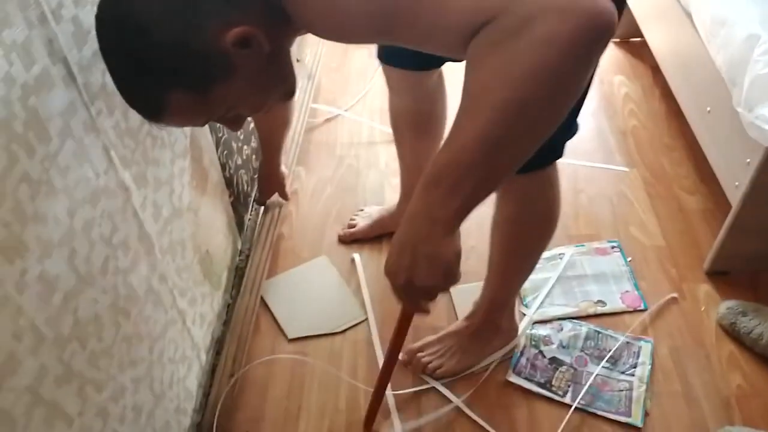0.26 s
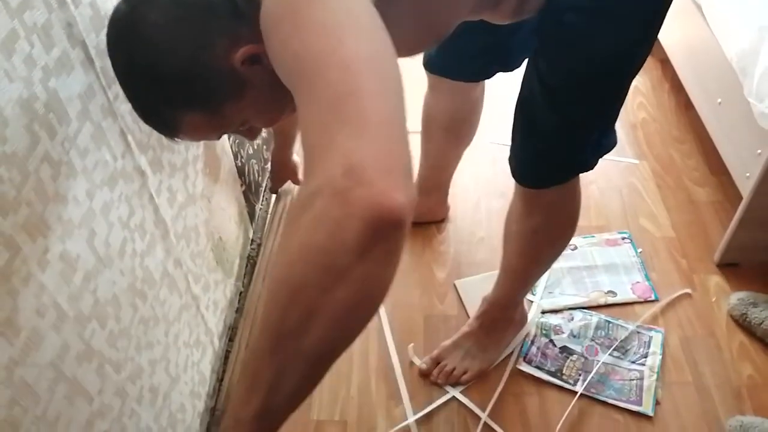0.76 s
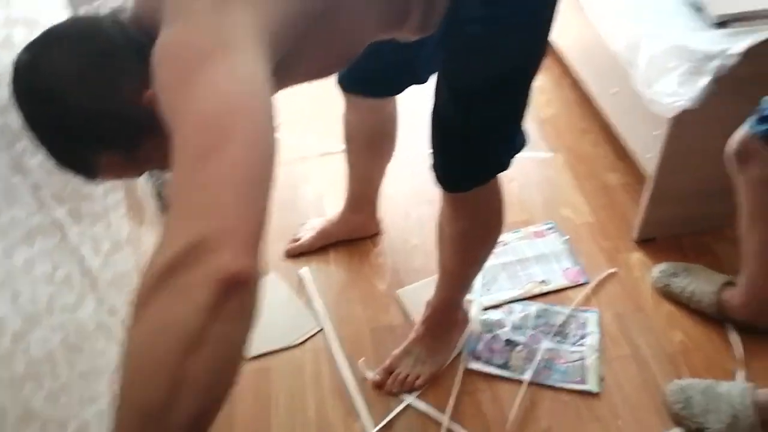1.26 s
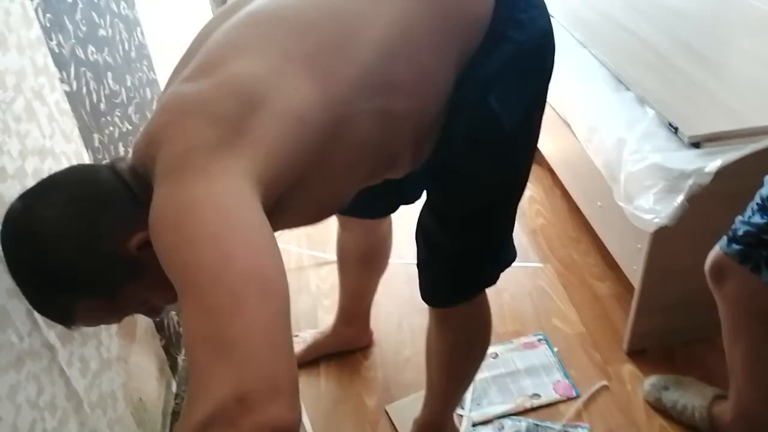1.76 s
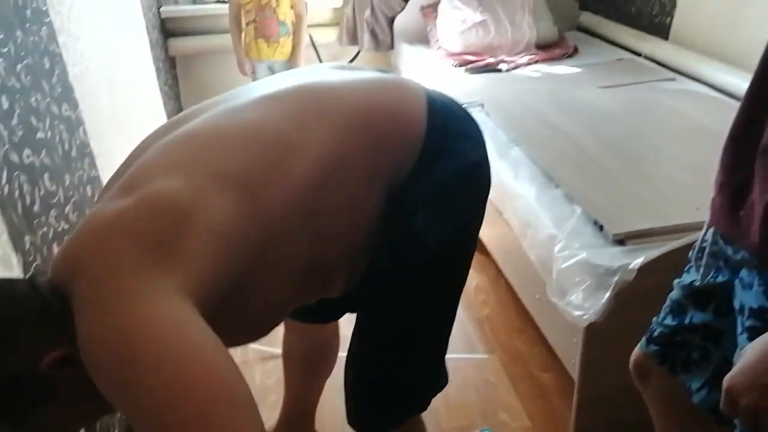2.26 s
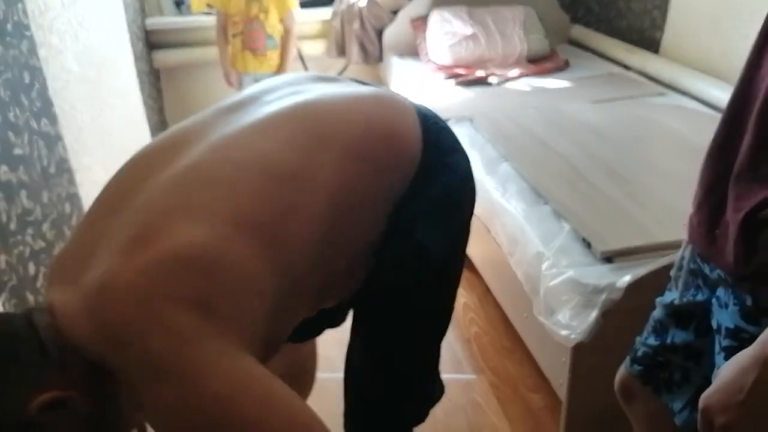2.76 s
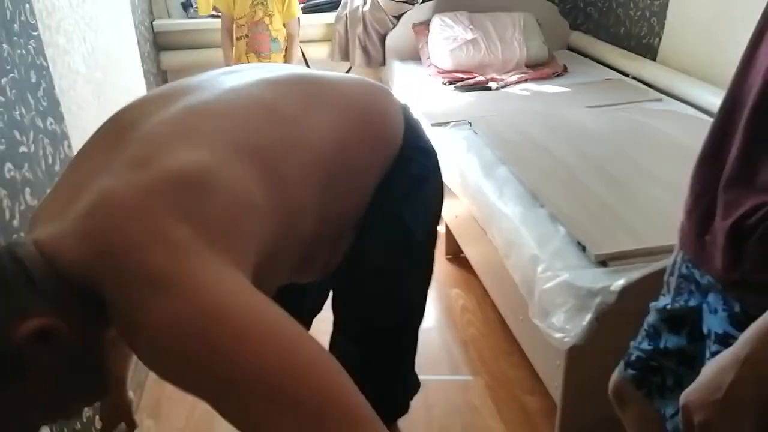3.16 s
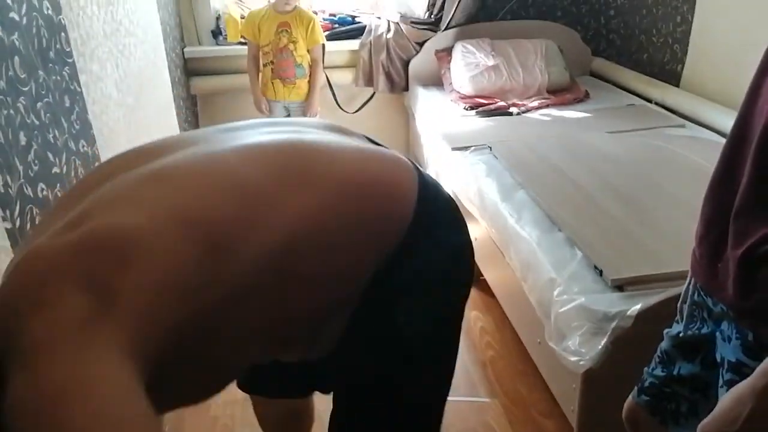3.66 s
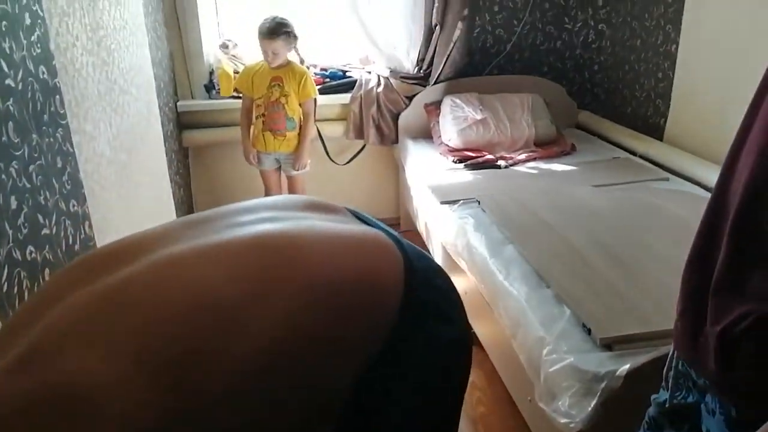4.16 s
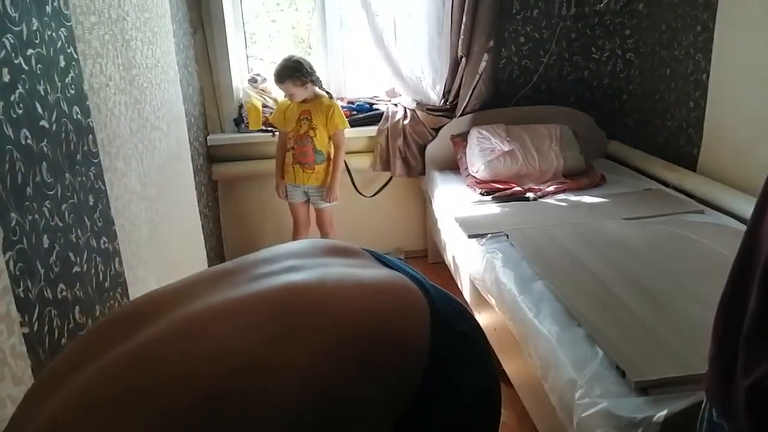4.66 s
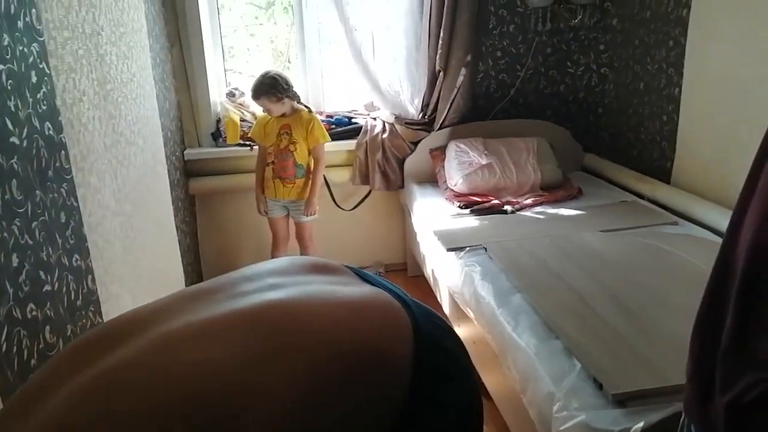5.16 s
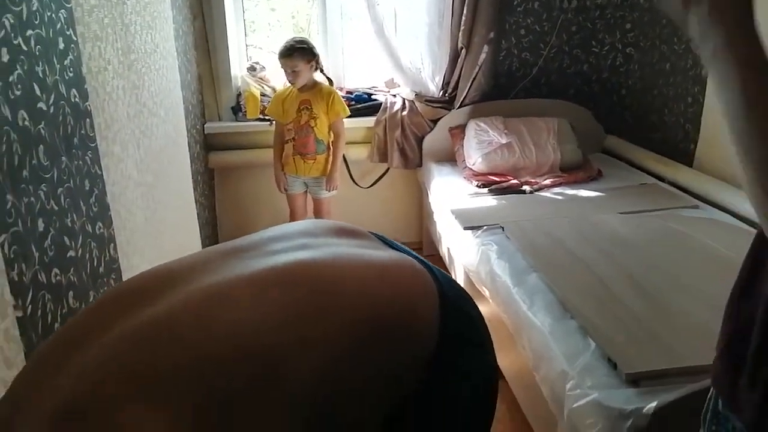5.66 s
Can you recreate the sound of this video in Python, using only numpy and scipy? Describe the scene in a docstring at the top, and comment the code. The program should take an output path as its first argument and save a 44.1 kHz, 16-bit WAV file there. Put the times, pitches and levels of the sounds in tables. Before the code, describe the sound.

A bar pries wooden boards loose in a small room: scattered knocks and cracks, a creaking nail, then a burst of much louder wooden blows.

```python
"""Prying skirting loose

A bar pries wooden skirting loose in a small furnished room, a step from a handheld phone.
Boards knock as crowded damped modes with a crack of noise; a nail creaks out in stick-slip rasps.
Feet and wood scuff as grainy noise, and floor modes thud when struck and groan when pushed.
Low damped sways of the phone in the hand, the room's tail and a steady hush complete the take."""
import sys
import numpy as np
from scipy import signal
from scipy.fft import rfft, irfft
from scipy.io import wavfile

SR = 44100
rng = np.random.default_rng(int(sys.argv[2]) if len(sys.argv) > 2 else 0)


def invert_db(x):
    """Field ratio 10**(x/20) for x, a level in decibels (scalar or array-like)."""
    u = np.asarray(x, float) / 20
    return 10 ** u


def generate_wav(signal):
    """Clip the signal to [-1, 1] and save it as 16-bit WAV at the path in sys.argv[1]."""
    frames = np.transpose(np.atleast_2d(signal))
    scaled = np.clip(frames, -1, 1) * 32767
    pcm = np.round(scaled).astype(np.int16)
    wavfile.write(sys.argv[1], SR, pcm)


N = 260190  # samples, 5.9 s

# Knocks of board and bar. Each row: time in seconds, board level in dB, strongest board pitch in Hz,
# crack level before its colouring in dB relative to the board.
BLOWS = [(0.078, -53, 2200, 10), (0.094, -39.5, 2930, 15), (0.267, -40, 1083, 12.5),
         (0.519, -35.5, 1090, 7.5), (0.53, -30.5, 2520, 8.5), (0.601, -40, 1860, 5.5),
         (0.648, -25.5, 3200, -0.5), (0.651, -27, 900, 5), (0.689, -30, 1000, -25),
         (0.785, -31.5, 2680, -1.5), (0.893, -34.5, 1100, -4.5), (0.899, -27.5, 960, -19),
         (0.993, -30, 787, -4.5), (1.31, -46, 2580, 16), (1.328, -46, 3000, 21.5),
         (1.355, -38.5, 1090, 10.5), (1.572, -40.5, 2740, -14), (1.65, -33.5, 2150, 1.5),
         (1.811, -48.5, 940, 5), (1.972, -43, 764, -32), (2.014, -41.5, 2370, 5), (2.075, -42, 780, -25),
         (2.247, -26.5, 576, -20), (2.302, -36.5, 3410, 19), (2.684, -31.5, 2000, 1),
         (3.078, -37.5, 2400, 1), (3.083, -21.5, 1990, -9), (3.297, -47.5, 950, -3), (3.48, -33, 2540, -2),
         (3.528, -43, 2480, 6), (3.531, -31.5, 2800, 0), (3.579, -39.5, 1780, -24), (3.971, -43, 700, -5.5),
         (4.085, -45, 1166, 1), (4.16, -45.5, 1170, 0), (4.235, -36.5, 1000, -13),
         (4.311, -41.5, 2980, -2.5), (4.97, -55, 3020, 11), (5.039, -29, 1090, 6), (5.085, -11.5, 830, 0.5),
         (5.151, -13.5, 773, 2), (5.459, -13.5, 1930, 1.5), (5.7, -10, 746, 0), (5.752, -13.5, 620, 1),
         (5.802, -16, 820, 1)]
# Modes of the floorboards. Each row: pitch in Hz, relative level in dB,
# time to ring down 60 dB with no weight on the board in seconds.
FLOOR_MODES = [(60, -45, 0.12), (100, -2, 0.094), (155, -4.5, 0.044), (185.8, 4.5, 0.1), (232.8, 1.5, 0.15),
               (291.1, 3, 0.11), (349, -0.5, 0.036), (412.3, 1.5, 0.25), (484, -20, 0.097)]


def unit(x):
    """Scale to rms 1."""
    return x / np.sqrt(np.mean(x ** 2))


def read(points, hz):
    """A curve table at the given frequencies, straight lines over log frequency."""
    f, v = np.transpose(points)
    return np.interp(np.log(np.maximum(hz, 1)), np.log(f), v)


def colour(x, points, taps=1024):
    """Causal filter with the gain of (Hz, dB) points, from the folded cepstrum."""
    grid_hz = np.arange(taps + 1) * SR / 2 / taps
    cepstrum = irfft(np.log(invert_db(read(points, grid_hz))))
    cepstrum[1:taps] *= 2
    cepstrum[taps + 1:] = 0
    impulse = irfft(np.exp(rfft(cepstrum)))[:taps]
    return signal.oaconvolve(x, np.atleast_2d(impulse), axes=-1)[:, :N]


def band(x, hz, width):
    """One resonance, gain 1 at the centre."""
    return signal.lfilter(*signal.iirpeak(hz, hz / width, SR), x)


def curves(table):
    """Columns of a time table at every sample."""
    s, *columns = np.transpose(table)
    return [np.interp(np.arange(N) / SR, s, c) for c in columns]


def sides(pan_db):
    """Left and right gain for a left minus right difference in dB."""
    return invert_db(np.array([pan_db, -pan_db]) / 2)


def add(out, s, sound):
    """Mix a sound in at time s."""
    i = int(s * SR)
    out[:, i:i + sound.shape[1]] += sound[:, :N - i]


def pair(n, unlike):
    """Noise for both microphone ports, partly unrelated."""
    mid, side = rng.standard_normal((2, n))
    return mid + unlike * side * np.array([[1], [-1]])


def ring(modes, t, near_hz, octaves):
    """One blow: modes close to near_hz speak most, each with a chance phase; peak 1."""
    hz, db, t60 = np.transpose(modes)[:, :, None]
    struck_db = np.maximum(-6 * (np.log2(hz / near_hz) / octaves) ** 2, -33)
    phase = 2.094 * rng.standard_normal((len(modes), 1))
    decay = invert_db(db + struck_db - 60 * t / t60)
    y = np.sum(decay * np.sin(2 * np.pi * hz * t + phase), axis=0)
    return y[None] / np.abs(y).max()


def stroke(length):
    """Level of one stroke: bites quickly, catches and slips on the way, eases off."""
    bite_share, ease_share = 0.2, 0.38  # of the stroke's length
    u = np.linspace(0, 1, int(length * SR))
    catches = rng.standard_normal(40)[:int(length * 60) + 2]
    uneven_db = 2.2 * np.interp(u, np.linspace(0, 1, len(catches)), catches)
    return invert_db(uneven_db) * np.minimum(u / bite_share, 1) * np.minimum((1 - u) / ease_share, 1)


def grains(per_s, spread_db, smear_s):
    """Dense grit: noise whose size jumps from grain to grain and trails off."""
    hits = (rng.random(N) < per_s / SR) * invert_db(spread_db * rng.exponential(size=N))
    size = signal.lfilter([1], [1, -np.exp(-1 / (smear_s * SR))], hits)
    return size * pair(N, 0.88)


def board_modes():
    """A loose board has many crowded, quickly damped modes, new for each blow; high ones die first."""
    # Strength of the board's modes. Each row: frequency in Hz, relative level in dB.
    board_levels = [(350, -9), (550, -6), (900, -1), (1500, -1), (2100, 1), (3000, -2), (3800, -12),
                    (4500, -8)]
    count, t60_at_1khz_s = 70, 0.03
    shift, size = rng.random((count, 2)).T
    hz = 400 + 4000 * ((np.arange(count) + shift) / count) ** 1.282
    db = read(board_levels, hz) - 4 * size
    return np.transpose([hz, db, t60_at_1khz_s * (hz / 1000) ** -.4])


def knocks():
    """Board modes and a short dry crack at every blow; harder blows wake modes over more octaves."""
    # Colour of the crack. Each row: frequency in Hz, gain in dB.
    snap_colour = [(1470, -23.5), (2500, -12.5), (2970, -8.5), (3740, -17.5), (3950, -13), (4730, -7.5),
                   (5650, -9.5), (8330, -8), (9290, -24), (15000, -28.5), (16000, -31)]
    soft_db, reach_octaves, reach_per_db = -26.5, 0.68, 0.41  # reach grows above soft_db
    rise_cycles = 1.05  # so blows of lower pitch push longer
    crack_rise_s, crack_fade_s = 0.00065, 0.0049
    wood, crack = np.zeros((2, 2, N))
    t = np.arange(SR // 10) / SR
    crack_shape = np.exp(-t / crack_fade_s) * np.minimum(t / crack_rise_s, 1)
    for s, db, board_hz, crack_db in BLOWS:
        reach = reach_octaves + reach_per_db * max(db - soft_db, 0)
        push = np.minimum(t * board_hz / rise_cycles, 1)
        add(wood, s, invert_db(db) * ring(board_modes(), t, board_hz, reach) * push)
        add(crack, s, invert_db(db + crack_db) * pair(len(t), 1.0) * crack_shape)
    return wood + colour(crack, snap_colour)


def nail():
    """Stick-slip: each slip is a short rasp that rings the nail and bar; gaps glide and waver."""
    # Creaks. Each row: start in seconds, end in seconds, first gap in ms, last gap in ms,
    # rasp level in dB before the chance and gap changes of each slip.
    creaks = [(2.257, 2.35, 14.27, 15.4, -15), (2.483, 2.485, 24.7, 24, -18.5),
              (2.514, 2.625, 18, 4.5, -9.5)]
    # Resonances of nail and bar. Each row: pitch in Hz, width after both passes in Hz (roughly),
    # level in dB, left minus right in dB.
    nail_modes = [(3400, 450, -8, 3), (4100, 400, -9, 3), (7050, 500, -4, -6), (7600, 450, 0, -8),
                  (8150, 550, -2, -8), (11700, 800, -22, 0)]
    breakaway_db, rest_s = 6, 0.08  # the first slip after a rest is strongest
    db_per_halving = -10  # quicker slips release less
    slip_share = 0.082  # rise time of a slip as a share of the gap to the next
    widen = 1.6  # each resonance acts twice, so each pass starts wider
    slips, t, last = np.zeros((2, N)), np.arange(SR // 40) / SR, 0
    for start, end, gap0_ms, gap1_ms, db in creaks:
        s = start
        chance = rng.standard_normal((40, 2)) * [1.5, .02]  # dB, share of the gap
        for size_db, waver in chance:
            if s > end:
                break
            gap_ms = gap0_ms + (s - start) / (end - start) * (gap1_ms - gap0_ms)
            slip_db = db + size_db + db_per_halving * np.log2(gap0_ms / gap_ms)
            slip_db += breakaway_db * (s - last > rest_s)
            u = t / (slip_share * gap_ms / 1000)
            add(slips, s, invert_db(slip_db) * pair(len(t), 0.38) * u * np.exp(1 - u))
            last = s
            s += gap_ms * (1 + waver) / 1000
    body = np.zeros((2, N))
    for k, (hz, width, db, pan) in enumerate(nail_modes):
        tone = band(band(slips, hz, widen * width), hz, widen * width)
        body += (-1) ** k * invert_db(db) * sides(pan)[:, None] * tone  # neighbours in opposite polarity
    return body + invert_db(-16.5) * band(slips, 1200, 5700)


def scuffing():
    """Soles and wood dragged over a dusty floor; each stroke bites quickly and eases off."""
    # Scuffs. Each row: start in seconds, length in seconds, grit level in dB,
    # dull rub in dB relative to the grit, fine dust in dB relative to the grit.
    strokes = [(0, 0.011, -45, -6, -28), (0.054, 0.26, -49.5, -19, -9), (0.361, 0.15, -47.5, -30, -10),
               (0.532, 0.13, -60, -6.5, -26), (0.658, 0.083, -58.5, 11.5, -23),
               (0.747, 0.082, -54.5, 1.5, -14.5), (1.014, 0.59, -72.5, 2, -30), (1.3, 0.072, -54.5, 0, -7),
               (1.439, 0.12, -61, -40, -8), (1.565, 0.088, -51.5, -9, -6.5), (1.642, 0.028, -51, -1, -2.5),
               (1.809, 0.008, -60, -40, 7), (1.871, 0.23, -62, -3, -9), (2.2, 0.28, -72, 15, -18),
               (2.651, 0.12, -54.5, -6, -34), (3.008, 0.24, -68.5, -3, -5.5),
               (3.226, 0.11, -61.5, -26, -7.5), (3.342, 0.13, -51, -24, -5.5),
               (3.474, 0.32, -59.5, -4, -31), (3.778, .12, -64, -33, -8.5), (3.953, 0.042, -69, 2.5, -16),
               (4.268, 0.23, -65, 0, -21), (4.532, 0.24, -72, 6.5, -26), (4.965, 0.064, -54, -17, -7)]
    # Colour of the grit. Each row: frequency in Hz, relative level in dB per Hz.
    grit_colour = [(290, -64), (500, -34), (819, -6.5), (974, -4.5), (1050, -6.5), (1440, -7.5),
                   (3110, -2.5), (3860, -10.5), (6140, -4), (7100, 5), (10800, -13), (14900, -11),
                   (16000, -25.5)]
    # Colour of the dull rub. Each row: frequency in Hz, relative level in dB per Hz.
    rub_colour = [(250, -21.5), (420, -5), (900, 0.5), (2200, -6), (3200, -10), (3900, -22.5), (6000, -27),
                  (10000, -48.5)]
    gains = np.zeros((3, N))
    for s, length, db, rub_db, dust_db in strokes:
        levels_db = db + np.array([[0], [rub_db], [dust_db]])
        add(gains, s, invert_db(levels_db) * stroke(length))
    grit = unit(colour(grains(1200, 2.2, .002), grit_colour))
    rub = unit(colour(grains(900, 2.2, .003), rub_colour))
    dust = unit(band(band(grains(1500, 1.5, 0.00099), 12000, 6000), 12000, 6000))
    return gains[0] * grit + gains[1] * rub + gains[2] * dust


def thuds():
    """Floor modes, slower to speak, under each knock and each landing weight."""
    # Weight landing on the floorboards. Each row: time in seconds, level in dB,
    # strongest floor pitch in Hz.
    landings = [(0.268, -49.5, 220), (0.689, -38.5, 272), (0.9, -35, 73), (0.997, -31, 302),
                (1.354, -48, 257), (1.571, -43, 86.5), (1.811, -53.5, 197), (1.92, -52, 192),
                (1.971, -45, 176), (2.077, -43, 182), (2.246, -39, 206), (2.301, -42.5, 233),
                (3.082, -46, 420), (3.295, -50.5, 306), (3.971, -44, 295), (4.087, -49.5, 182),
                (4.239, -39, 276), (4.309, -51.5, 159)]
    octaves, rise_s = 0.44, 0.0024
    ring_share = 0.85  # the weight on a floorboard shortens its ring
    floor, t = np.zeros((2, N)), np.arange(SR // 4) / SR
    # every knock also shakes the floor under the board, the more so the harder it is
    under = [(s, -10 + 1.93 * db, 194) for s, db, *_ in BLOWS]
    loaded = np.array(FLOOR_MODES) * [1, 1, ring_share]
    for s, db, hz in landings + under:
        add(floor, s, invert_db(db) * ring(loaded, t, hz, octaves) * np.minimum(t / rise_s, 1))
    return floor


def groans():
    """Floorboards under moving weight: many small shifts keep the floor modes sounding."""
    # Groans. Each row: start in seconds, length in seconds, level of the push in dB.
    shifts = [(0.682, 0.057, -38), (1.896, 0.25, -41.5), (2.262, 0.1, -32), (2.492, 0.098, -27),
              (3.285, 0.28, -53.5), (4.28, 0.6, -51.5)]
    gain = np.zeros((1, N))
    for s, length, db in shifts:
        add(gain, s, invert_db(db) * stroke(length)[None])
    push = gain * unit(grains(200, 1.5, .004))
    # a mode that falls 60 dB in t60 is about 2.17 / t60 wide
    return sum(invert_db(db) * band(push, hz, 2.17 / t60) for hz, db, t60 in FLOOR_MODES)


def hand():
    """Each jolt of the hand-held phone is a low damped sway with some rumble; more rumble lies below."""
    # Jolts of the hand that holds the phone. Each row: time in seconds, level in dB, pitch in Hz.
    jolts = [(0.102, -46, 39), (0.273, -29.5, 20.8), (0.437, -42.5, 40), (0.703, -45, 55), (0.9, -34, 52.5),
             (1.37, -50, 69.7), (1.57, -50, 47.7), (1.948, -42.5, 48.6), (2.278, -50, 35.6),
             (2.49, -49, 46), (3.22, -54, 27.5), (3.551, -36, 49), (4.081, -46, 60), (5.086, -47, 44.4),
             (5.459, -51, 47.7), (5.698, -38.5, 48)]
    t60_s, rise_cycles = 0.32, 1.5
    out, t = np.zeros((2, N)), np.arange(SR // 2) / SR
    rumble = unit(band(band(pair(N, .25), 90, 91), 90, 91))
    for s, db, hz in jolts:
        i = int(s * SR) % (N - len(t))
        sway = np.sin(2 * np.pi * hz * t) + 0.22 * rumble[:, i:i + len(t)]
        add(out, s, invert_db(db - 60 * t / t60_s) * np.minimum(t * hz / rise_cycles, 1) * sway)
    return out + invert_db(-77) * rumble


def hush():
    """Steady coloured noise of the quiet room, unrelated at the two ports."""
    # Colour of the hush. Each row: frequency in Hz, relative level in dB per Hz.
    hush_colour = [(20, -2), (50, -8.5), (200, -17), (1200, -24.5), (3000, -25), (4500, -33.5),
                   (7000, -21.5), (16000, -38)]
    return invert_db(-78) * unit(colour(rng.standard_normal((2, N)), hush_colour))


def room(x):
    """Diffuse tail of a small room: noise fading at its own rate per octave, unlike at each port."""
    # Early decay of the room. Each row: frequency in Hz, time to fall 60 dB in seconds.
    room_decay = [(125, 0.3), (500, .28), (1200, 0.2), (2500, 0.32), (5000, 0.43), (8000, 0.24),
                  (14000, 0.26)]
    late_db, late_t60_s = -32, 0.99  # slower ring of the adjoining space
    t = np.arange(SR // 2) / SR
    hz, tail = np.arange(len(t) // 2 + 1) * SR / len(t), 0
    noise = rng.standard_normal((3, len(t)))
    spectrum = rfft(noise[:2] + .5 * noise[2])  # the third noise is common to both ports
    late = invert_db(late_db - 60 * t / late_t60_s)
    for centre in 63 * 2. ** np.arange(9):
        octave = np.maximum(1 - np.abs(np.log2(np.maximum(hz, 1) / centre)), 0)
        early = invert_db(-60 * t / read(room_decay, centre))
        tail = tail + irfft(spectrum * octave, len(t)) * (early + late)
    tail = tail * np.clip((t - .002) / 0.006, 0, 1)
    tail = tail / np.sqrt(np.sum(tail ** 2) / 2)  # mean energy 1 per port
    return invert_db(-3.5) * signal.oaconvolve(x, tail, axes=-1)[:, :N]


def scene():
    """Work sounds direct and through the room, with the hand's rumble, over the hush."""
    # Where knocks and scuffs are heard. Each row: time in seconds, left minus right in dB.
    place = [(0.0, -4), (0.61, -3.5), (0.95, -4.5), (2.1, -5), (2.17, -2), (3.58, 2), (4.91, -0.5),
             (5.9, -4.5)]
    lag_s = 0.00014  # the right port hears the work a moment later
    work = sides(*curves(place)) * (knocks() + scuffing()) + nail() + thuds() + groans()
    near = work.copy()
    near[1] = np.roll(work[1], int(round(lag_s * SR)))
    return near + room(work) + hand() + hush()


def band_limit(x):
    """A steep low-pass at the top of the band."""
    return signal.sosfilt(signal.butter(12, 16820, fs=SR, output="sos"), x)


def record(dry):
    """Each port has its own colour; the mix is lifted, the loudest peaks rounded and the top cut."""
    # Difference between the microphone ports. Each row: frequency in Hz, left minus right in dB.
    port_colour = [(60, 2), (110, 3.5), (200, -2.5), (380, 5.5), (700, 3), (1290, 2.5), (2380, 10.5),
                   (4400, 6), (8120, 2), (15000, 7.5)]
    left = colour(dry[:1], [(hz, db / 2) for hz, db in port_colour])
    right = colour(dry[1:], [(hz, -db / 2) for hz, db in port_colour])
    rounded = np.tanh(2.608 * np.vstack([left, right])) / 1.957  # quiet sounds rise 2.5 dB
    top_cut = signal.ellip(8, .2, 60, 16000, fs=SR, output="sos")
    mix = signal.sosfilt(top_cut, rounded)
    return band_limit(mix)


dry = scene()
out = record(dry)
generate_wav(out)
```